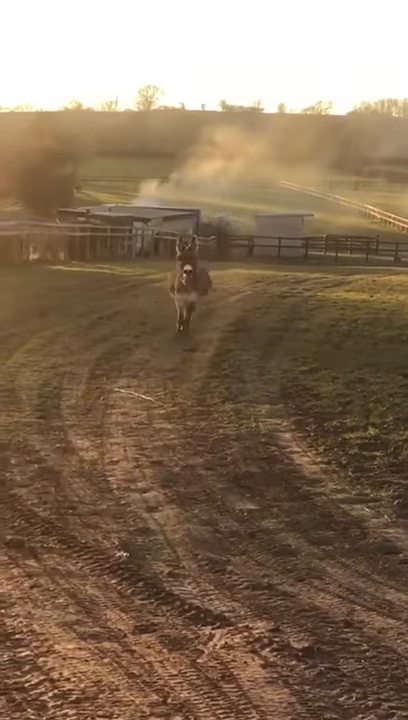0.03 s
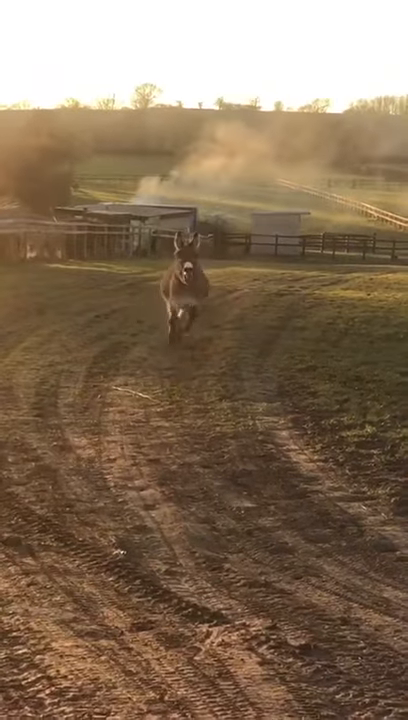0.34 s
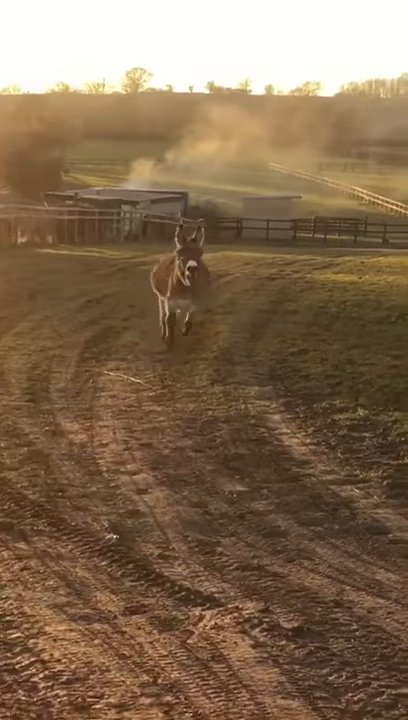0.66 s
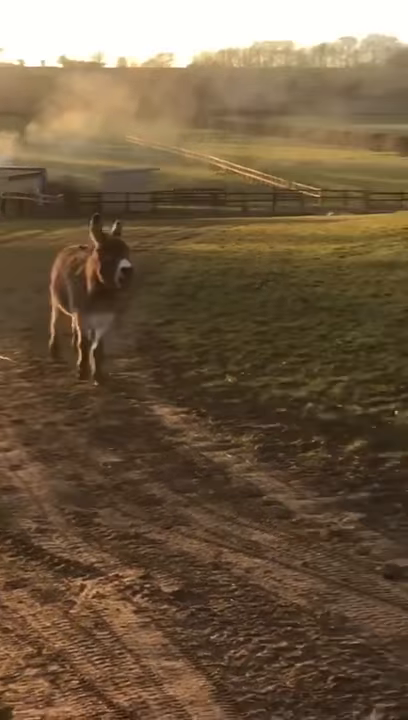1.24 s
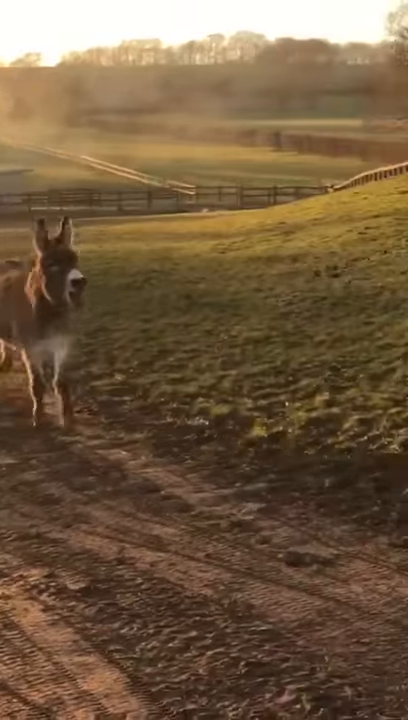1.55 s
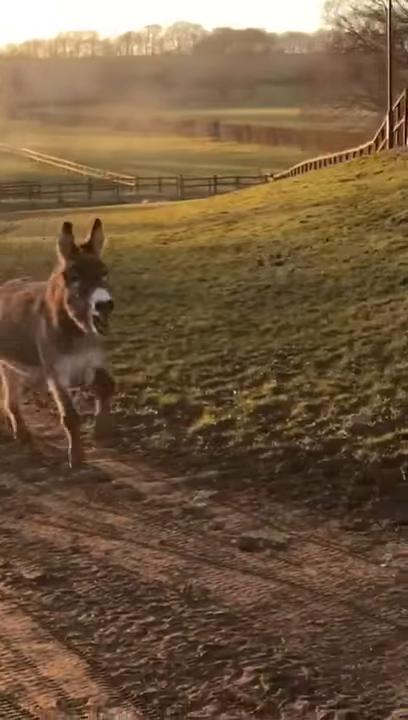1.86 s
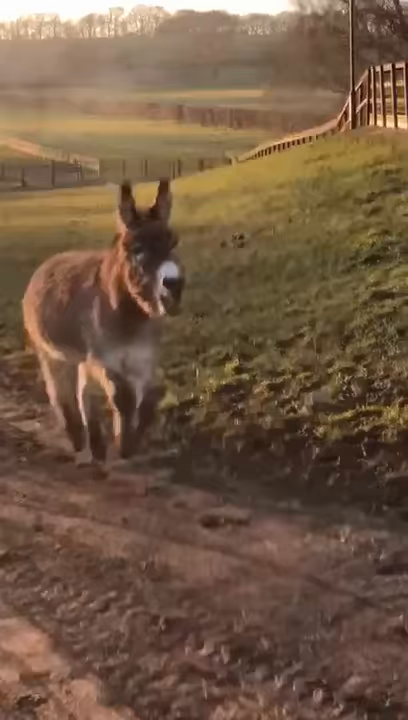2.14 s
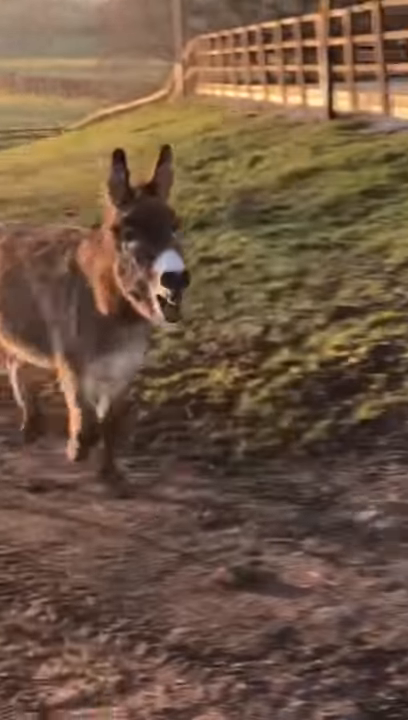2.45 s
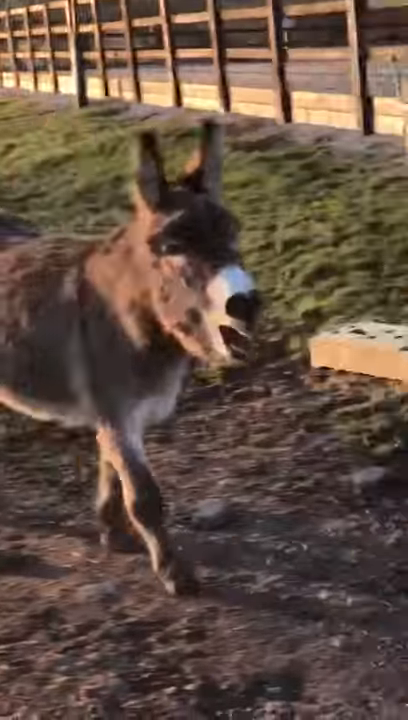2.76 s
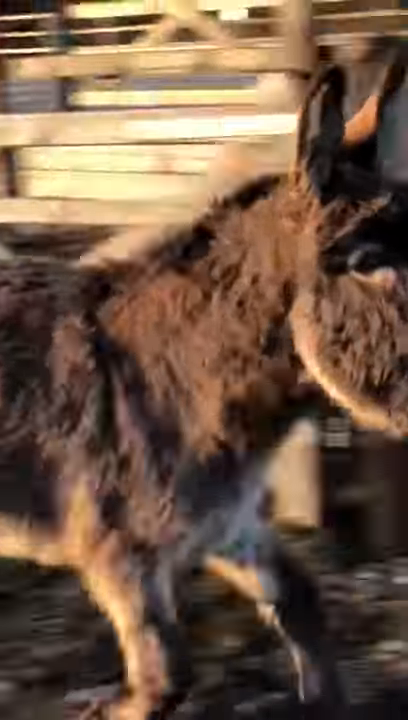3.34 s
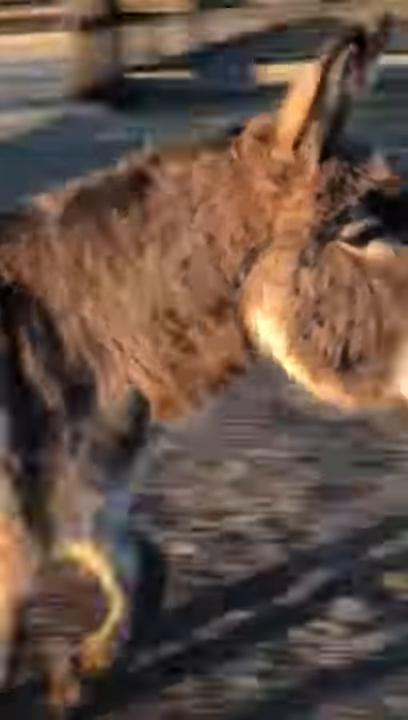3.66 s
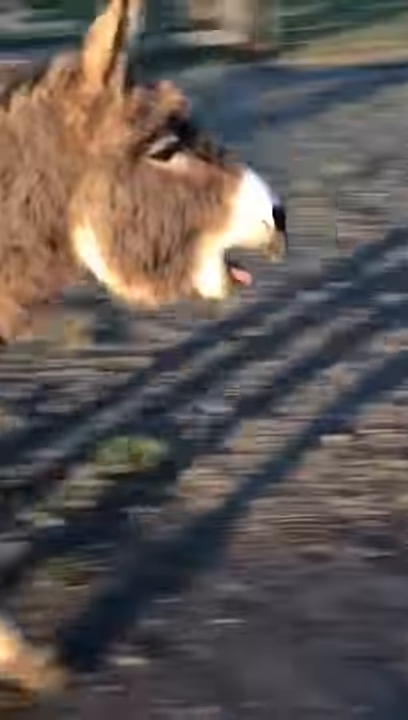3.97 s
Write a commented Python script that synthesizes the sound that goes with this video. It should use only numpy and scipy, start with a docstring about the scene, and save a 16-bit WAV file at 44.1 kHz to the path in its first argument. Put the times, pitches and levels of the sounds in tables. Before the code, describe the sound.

Loud braying from an approaching donkey: hoarse, lower haws alternate with squealing gasps that end in thin whistles. The later calls sound nearer the microphone, with a faint outdoor echo over soft hiss and low rumble.

```python
"""A donkey brays five times as it comes across a field and passes close by.
Its vocal folds chop the breath into pulses: each "haw" starts as a clear note, then breaks into a
rough, lower roar. Between haws it sucks in air with a wheezing "hee" that ends in a thin whistle,
and it grunts as the breath turns around. The field echoes faintly over a hiss, a rumble and a hum."""
import sys
import numpy as np
from scipy import signal
from scipy.fft import rfft, irfft, next_fast_len
from scipy.io import wavfile
from scipy.ndimage import uniform_filter1d, minimum_filter1d

SR = 44100
rng = np.random.default_rng(int(sys.argv[2]) if len(sys.argv) > 2 else 0)


def file_out(sig):
    """Save sig as 16-bit WAV at sys.argv[1]."""
    # one column per channel
    cols = np.atleast_2d(sig).T
    # limit, then scale
    lim = np.clip(cols, -1, 1)
    pcm = np.round(lim * 32767).astype(np.int16)
    wavfile.write(sys.argv[1], SR, pcm)


N = 176400

# Tone colours of the open air, the rumble and the echo: (frequency [Hz], relative level [dB])
AIR_COLOUR = [(130, -11), (250, 19.5), (1100, 23), (2200, 20), (4200, 15), (11500, -6)]
RUMBLE_COLOUR = [(20, -22), (55, 6), (110, 4), (190, -2.5), (700, -35), (2000, -53)]
ECHO_COLOUR = [(200, -17), (1100, -3.5), (2000, -5), (3000, -17), (4200, -10), (12000, -30.5)]
# How loud the rumble and the hum are: (time [s], level [dB])
RUMBLE_LEVEL = [(0, -50), (1.15, -54), (1.62, -38), (1.77, -48.5), (1.85, -34.5), (1.95, -45), (2.5, -55.5),
                (3.15, -51), (4, -65.5)]
HUM_LEVEL = [(0, -47.5), (2, -60)]
# How long the echo lasts: (frequency [Hz], time to fade by 60 dB [s])
ECHO_DECAY = [(200, 0.88), (1000, 0.24), (4200, 0.43), (7000, 0.38)]

# Tone colours of the voice and breath: (frequency [Hz], relative level [dB])
NOTE_THROAT = [(250, -24.5), (500, -6.5), (950, 3.5), (1550, 4), (2050, -7.5), (2550, -29.5), (3400, -20),
               (4200, -19), (5200, -34), (6300, -28.5), (8000, -42.5), (11500, -46)]
ROAR_THROAT = [(230, -33.5), (450, -7.5), (670, -9.5), (790, -9.5), (980, 9), (1350, -2), (2000, -5.5),
               (2450, -22.5), (4600, -15), (7200, -30), (8500, -44.5), (11500, -37)]
FAR_THROAT = [(230, -27.5), (400, -9.5), (630, -7), (760, -30), (980, 6.5), (1230, 2.5), (1750, 1),
              (2400, -22.5), (4100, -21.5), (6300, -22), (11500, -66)]  # the roar from far away
LEAK_COLOUR = [(300, -43.5), (1200, -3.5), (3000, -19), (4400, -10.5), (7300, -25), (11500, -34.5)]  # air leaking past the folds
RUSH_COLOUR = [(150, -22), (600, -21), (1050, -5.5), (1600, -12.5), (2300, -2.5), (2700, -5.5), (3600, -2),
               (4700, -9), (6200, -12.5), (7400, -16.5), (9600, -22.5), (11500, -36)]  # rushing breath
# Where the voice flickers most: (frequency [Hz], share of the full flicker [0-1])
FLICKER_SHARE = [(1800, .1), (3000, .7), (4200, .4), (6000, 1)]
# The throat's resonances, the pitches it rings at: (frequency [Hz])
THROAT_RINGS = [850, 1250, 1800]
# The mouth's resonances in a roar:
# (time [s], low boost [dB], middle frequency [Hz], middle boost [dB], upper frequency [Hz])
MOUTH_SHAPE = [(.33, -6.5, 1696, 4.5, 4210), (1.301, 2, 1410, 5, 4110), (2.07, 2.5, 1985, 6, 4560),
               (2.24, 2, 1784, 8.5, 4166), (2.32, -4, 1670, 4.5, 4120), (2.489, -1, 1546, 3.5, 3810),
               (3.072, 3.5, 1806, 9.5, 3910), (3.189, -7.5, 1676, 2, 4280), (3.249, -14, 1938, 6, 4620),
               (3.32, -7.5, 1936, 2.5, 4520), (3.92, 2, 1835, 8, 4700)]
# The upper resonance fades as the head turns aside: (time [s], strength [dB])
HEAD_TURN = [(2.5, -4), (3.2, -8.5), (4, -22)]

# Grunts: (start [s], length [s], first pitch [Hz], last pitch [Hz], level [dB], roughness [0-1],
# treble [dB])
GRUNTS = [(0.038, .11, 128.7, 243, -36.5, 0.24, 15), (0.549, 0.049, 368.7, 403, -27.5, 0.34, -6),
          (0.657, 0.073, 299.4, 210.5, -33.5, 0.23, 9.5), (0.964, 0.038, 222.4, 189, -38, 0.35, 9),
          (1.933, 0.034, 227.4, 174, -35.5, 0.54, 4), (2.573, 0.06, 103.8, 93.3, -43.5, 0.46, 15)]
# One spit of air: (start [s], length [s], level [dB])
CRACKLE = (3.157, 0.017, -23.5)
# Whistles: (start [s], length [s], first pitch [Hz], last pitch [Hz], level [dB])
WHISTLES = [(0.888, 0.075, 5380, 5420, -31.5), (1.683, 0.043, 5130, 5210, -23),
            (1.728, 0.22, 5220, 5247, -30), (1.857, 0.059, 5090, 5440, -25.5),
            (2.816, 0.059, 5170, 5360, -24), (3.66, 0.12, 4830, 5220, -33.5)]
# In-breaths, one curve each: (time [s], upper resonance [Hz], lower resonance [Hz],
# upper level [dB], lower level [dB], rush level [dB])
HEES = [
    [(.729, 4210, 2274, -25, -63, -43), (.76, 4340, 2180, -21, -36, -31.5),
     (.785, 4210, 1950, -13, -29.5, -28), (.825, 4180, 1780, -11.5, -15.5, -26),
     (.865, 4167, 1777, -9.5, -13.5, -24.5), (.9, 3970, 1784, -13.5, -22, -28),
     (.945, 4050, 2290, -34, -33.5, -37)],
    [(1.518, 4400, 2260, -40, -79, -34.5), (1.555, 4630, 2280, -16, -22, -28.5),
     (1.59, 4210, 2090, -11, -25.5, -20.5), (1.635, 4050, 1620, -18, -21, -22.5),
     (1.68, 3610, 1652, -24.5, -25.5, -25), (1.77, 3490, 2128, -25.5, -35.5, -35.5),
     (1.84, 3510, 2096, -24.5, -26, -29), (1.9, 3490, 2147, -27.5, -26.5, -30),
     (1.93, 3700, 2290, -47, -44, -60)],
    [(2.628, 4004, 2074, -41, -61, -34), (2.648, 4300, 2158, -13.5, -43, -30),
     (2.675, 4066, 2100, -16, -13, -19), (2.72, 4080, 1773, -10.5, -11.5, -20.5),
     (2.775, 4007, 1560, -15.5, -13.5, -17), (2.81, 3820, 1670, -19, -12.5, -21.5),
     (2.845, 3850, 1970, -50, -35, -21), (2.87, 3930, 2300, -53, -39, -66)],
    [(3.476, 3990, 2130, -34, -62, -36), (3.497, 4010, 2000, -17, -30.5, -29.5),
     (3.54, 4130, 1900, -14.5, -15, -22), (3.575, 4130, 1700, -19, -10.5, -20.5),
     (3.625, 3860, 1555, -23, -15.5, -27), (3.68, 4140, 1232, -35, -16, -32),
     (3.72, 4100, 1342, -51, -19.5, -26.5), (3.76, 4090, 1397, -65, -54, -40.5)],
]
# Clear notes, one curve each: (time [s], pitch [Hz], level [dB], treble [dB])
NOTES = [
    [(.185, 513, -34, -21), (.205, 506.6, -23, 4), (.272, 530.6, -14.5, 0), (.30, 528, -53, 15),
     (.41, 539.7, -23, -9), (.44, 525, -19, 7), (.54, 499, -17, 2), (.585, 471, -32, -9)],
    [(1.083, 502, -30, -1), (1.102, 502.6, -15.5, 2), (1.2, 531, -16, 6), (1.26, 533, -15, 7),
     (1.285, 501, -46, 12)],
    [(1.35, 494, -9.5, -12), (1.368, 491, -15, -19), (1.39, 443, -15, -12), (1.408, 400, -29, -4)],
    [(2.006, 470, -27, 0), (2.022, 436.4, -12, 7), (2.042, 450, -9, 2), (2.06, 490, -24, 6),
     (2.085, 503, -28, 0)],
    [(2.993, 494, -27, -25), (3.005, 458.7, -15.5, 2), (3.02, 482, -8, 0.5), (3.048, 498.7, -11.5, 1),
     (3.07, 537.5, -11.5, 9), (3.09, 507, -44, 16)],
    [(3.85, 472, -19, -17), (3.866, 428, -20, 0.5), (3.884, 430, -9.5, 3.5), (3.895, 507, -17, 5),
     (3.915, 503, -38, 8)],
]
# Roars, one curve each: (time [s], pitch [Hz], level [dB], base tone level [dB], roughness [0-1],
# treble [dB])
ROARS = [
    [(.262, 346.6, -21, -70, 0.8, -7), (.295, 337, -15, -20.5, 0.47, 0.5),
     (.33, 305.3, -14.5, -52, 0.12, -12), (.365, 336, -17, -30, 0.6, 0), (.39, 339, -16.5, -19, 0.15, -8),
     (.425, 358, -17.5, -38, 0.86, -1.5), (.455, 322, -19, -60, 0.6, -19)],
    [(1.25, 363.6, -16, -65, 0.87, -6), (1.285, 369.8, -13, -52, 0.65, 1.5),
     (1.32, 344.7, -12, -21.5, 0.37, -1), (1.35, 378.2, -13, -38, 0.49, 0.5),
     (1.385, 332, -23, -46, 0.54, 8), (1.42, 327, -29, -46, 0.6, -8)],
    [(2.04, 312.1, -16.5, -80, 0.75, -0.5), (2.08, 324, -8.5, -16, 0.77, -2.5),
     (2.115, 319.6, -6.5, -76, 0.39, -2.5), (2.16, 329.9, -10.5, -28, 0.19, -4),
     (2.26, 342, -9.5, -50, 0.25, -3), (2.31, 335.8, -5.5, -26.5, 0.28, -6.5),
     (2.45, 330.3, -7.5, -27.5, 0.14, -7.5), (2.48, 314.8, -5, -27, 0.39, -3),
     (2.5, 314, -7, -34, 0.32, -8.5), (2.518, 326, -17, -34, 0.54, -3)],
    [(3.058, 330.2, -20, -62, 0.2, -1), (3.078, 333, -9.5, -14, 0.97, -3),
     (3.11, 330.8, -14.5, -17.5, 0.1, 0.5), (3.16, 339.5, -11.5, -8, 0.35, -7),
     (3.195, 331.8, -7.5, -17.5, 0, -10), (3.24, 333, -8.5, -13.5, 0.37, -4.5),
     (3.31, 326.4, -8, -15, 0.64, -10), (3.345, 344.8, -12.5, -18, 0.66, -4.5),
     (3.385, 389, -42, -31, 0.9, -9)],
    [(3.897, 342.7, -10, -59, 0.3, -4), (3.918, 333.8, -9, -17.5, 0.65, -5.5),
     (3.95, 328.3, -9.5, -15, 0.16, -6), (4.01, 327.3, -18.5, -11, 0.2, 9)],
]
# Moments when a roar catches in the throat: (time [s])
CATCH_TIMES = [2.052, 2.09, 2.146, 2.177, 2.284, 2.31, 2.345, 2.366, 2.389, 2.419, 2.449, 3.13, 3.157]
# The octave above the base tone grows as the head passes: (time [s], relative level [dB])
OCTAVE_LEVEL = [(3.3, -39.5), (4, -10)]

NEAR_FROM_S, CHEST_FROM_S = 1.7, 2.7  # later roars sound near; later notes sound fuller
SLIPS_PER_S, SLIP_S = 28, .0032  # typical rate and duration of the folds' little slips


def amp(db):
    """Turns decibels into a number to multiply by."""
    return 10 ** (np.asarray(db) / 20)


def unit(x):
    """Scales a signal to an average strength (rms) of 1."""
    return x / np.sqrt(np.mean(x ** 2) + 1e-20)


def at_hz(table, hz):
    """Looks up a frequency in a table, giving each octave equal room."""
    f, value = np.transpose(table)
    return np.interp(np.log(hz + 1), np.log(f), value)


def at_time(table, t):
    """Reads each column of a table at the times t."""
    times, *columns = np.transpose(table)
    return [np.interp(t, times, column) for column in columns]


def gain_at(table, t):
    """Reads a curve of decibels as numbers to multiply by."""
    return amp(at_time(table, t)[0])


def controls(rows):
    """Gives the time of every sample in a curve, then each column at those times."""
    t = np.arange(round(rows[0][0] * SR), round(rows[-1][0] * SR)) / SR
    return [t] + at_time(rows, t)


def add(mix, start, sound, fade_s=.008):
    """Mixes a sound in, with soft ends."""
    i = np.arange(len(sound))
    fade = np.minimum(np.minimum(i, i[::-1]) / (fade_s * SR), 1)
    part = mix[max(round(start * SR), 0):][:len(sound)]
    part += (sound * fade)[:len(part)]


def noise(size):
    """Plain white hiss."""
    return rng.standard_normal(max(size, SR))[:size]


def wander(size, hz):
    """A random wobble, up to about hz times a second."""
    f = np.fft.rfftfreq(SR, 1 / SR)
    return unit(irfft(rfft(noise(SR)) / (1 + (f / hz) ** 4)))[:size]


def colour(x, table):
    """Gives a sound a tone colour and a strength of 1."""
    size = next_fast_len(len(x) + 2048)
    log_gain = np.log(amp(at_hz(table, abs(np.fft.fftfreq(size, 1 / SR)))))
    response = np.exp(np.conj(signal.hilbert(log_gain)))  # rings after a pulse, not before
    return unit(np.fft.ifft(np.fft.fft(x, size) * response).real[:len(x)])


def brighten(x, db):
    """Turns the treble up or down."""
    treble = signal.sosfiltfilt(signal.butter(3, 2600, 'high', fs=SR, output='sos'), x)
    return x + (amp(db) - 1) * treble


def background(air_db=-46.5, hum_hz=78):
    """The hiss of open air, an uneven low rumble and a distant hum."""
    t = np.arange(N) / SR
    rumble = gain_at(RUMBLE_LEVEL, t) * colour(noise(N), RUMBLE_COLOUR)
    hum = gain_at(HUM_LEVEL, t) * unit(np.sin(2 * np.pi * hum_hz * t))
    return amp(air_db) * colour(noise(N), AIR_COLOUR) + rumble + hum


def field_echo(x, db=-27, echoes_per_s=2000, build_s=.054):
    """Many tiny echoes bounce back from the bank, fences and sheds."""
    bounces = noise(SR) * (rng.random(SR) < echoes_per_s / SR)
    hz, t, bands = signal.stft(bounces, SR, nperseg=256)
    decay = amp(-60 * t / at_hz(ECHO_DECAY, hz)[:, None])
    tail = signal.istft(bands * decay, SR, nperseg=256)[1]
    tail = colour(tail * np.minimum(np.arange(len(tail)) / (build_s * SR), 1), ECHO_COLOUR)
    return signal.fftconvolve(x, tail / np.linalg.norm(tail))[:N] * amp(db)


def flicker(x, depth_db=4.2):
    """The treble of the voice comes and goes in random patches."""
    hz, _, bands = signal.stft(x, SR, nperseg=512, noverlap=384)
    patches = rng.standard_normal(bands.shape[::-1]).T
    for _ in range(2):
        patches = uniform_filter1d(uniform_filter1d(patches, size=5, axis=0), size=22, axis=1)
    share = np.interp(hz, *np.transpose(FLICKER_SHARE))[:, None]
    bands = bands * amp(depth_db * share * unit(patches))
    return signal.istft(bands, SR, nperseg=512, noverlap=384)[1][:len(x)]


def fold_pulses(cycles):
    """The vocal folds make one sharp pulse per cycle, shared here between two samples."""
    pulses = np.zeros(len(cycles))
    at = np.flatnonzero(np.diff(np.floor(cycles)) > 0)
    late = (np.floor(cycles[at + 1]) - cycles[at]) / (cycles[at + 1] - cycles[at])
    pulses[at], pulses[at + 1] = 1 - late, late
    return pulses - pulses.mean()


def swirl(hz, width_hz):
    """Swirling air in a resonance makes an unsteady tone; .real gives the sound."""
    drift = wander(len(hz), width_hz / 2) + 1j * wander(len(hz), width_hz / 2)
    return drift * np.exp(2j * np.pi * np.cumsum(hz) / SR)


def rasp(cycles, air_share, throat=ROAR_THROAT):
    """A pulse and a puff of air pass through the wide-open throat on every cycle."""
    puffs = (.75 + np.exp(-(cycles % 1) / .85)) * noise(len(cycles))
    pulses = colour(fold_pulses(cycles), throat)
    return np.sqrt(1 - air_share) * pulses + np.sqrt(air_share) * colour(puffs, throat)


def throat_ring(x, width_hz=260):
    """The throat stores each pulse and lets it out late, without changing its colour."""
    decay = np.exp(-np.pi * width_hz / SR)
    for hz in THROAT_RINGS:
        poles = [1, -2 * decay * np.cos(2 * np.pi * hz / SR), decay * decay]
        x = signal.lfilter(poles[::-1], poles, x)
    return x


def resonate(x, hz, width_hz):
    """Picks out the part of a sound near one frequency, which may glide."""
    spin = np.exp(2j * np.pi * np.cumsum(hz * np.ones(len(x))) / SR)
    decay = np.exp(-np.pi * width_hz / SR)
    return 2 * (spin * signal.filtfilt([1 - decay], [1, -decay], x / spin, padtype='even')).real


def mouth(x, t, low_hz=1060, width_hz=250, upper_width_hz=520):
    """Three resonances shape the roar; the upper two glide with the jaw and hiss with swirling air."""
    low_db, middle_hz, middle_db, upper_hz = at_time(MOUTH_SHAPE, t)
    facing = gain_at(HEAD_TURN, t)
    x = x + amp(middle_db - 25) * unit(swirl(middle_hz, width_hz).real)
    x = x + facing * amp(-24) * unit(swirl(upper_hz, upper_width_hz).real)
    x = x + (amp(low_db) - 1) * resonate(x, low_hz, width_hz)
    x = x + (amp(middle_db) - 1) * resonate(x, middle_hz, width_hz)
    return x + (amp(8 * facing) - 1) * resonate(x, upper_hz, upper_width_hz)


def grunt(start, length, first_hz, last_hz, db, rough, treble_db):
    """Slack folds give a short, gliding creak that swells and fades."""
    progress = np.linspace(0, 1, round(length * SR))
    cycles = np.cumsum(first_hz + (last_hz - first_hz) * progress) / SR
    swell = np.sin(np.pi * progress ** .88)
    return start, amp(db) * unit(brighten(rasp(cycles, rough), treble_db) * swell)


def crackle(start, length, db):
    """A brief spit of air as the folds burst open."""
    size = round(length * SR)
    return start, amp(db) * unit(colour(noise(size), RUSH_COLOUR) * np.hanning(size))


def whistle(start, length, first_hz, last_hz, db, waver_hz=38, flutter_db=4, octave_db=-21):
    """The in-breath ends in a thin, unsteady whistle with a faint octave above it."""
    progress = np.linspace(0, 1, round(length * SR))
    hz = first_hz + (last_hz - first_hz) * progress + waver_hz * wander(len(progress), 233)
    phase = 2 * np.pi * np.cumsum(hz) / SR
    swell = np.sin(np.pi * progress) * amp(flutter_db * wander(len(progress), 85))
    return start, amp(db) * unit(swell * (np.sin(phase) + amp(octave_db) * np.sin(2 * phase)))


def hee(rows, waver_hz=65, full_squeal_db=-15, fray_db=-9.5, flutter_db=1.5):
    """Air rushing in sets off two resonances: they squeal when driven hard and fray when weak."""
    t, upper_hz, lower_hz, upper_db, lower_db, rush_db = controls(rows)
    tones = 0
    for hz, width_hz, db in (upper_hz, 137, upper_db), (lower_hz, 224, lower_db):
        firmness = amp(.65 * np.minimum(db - full_squeal_db, 0))
        squeal = swirl(hz + waver_hz * wander(len(t), 241), width_hz)
        squeal = unit((squeal / np.hypot(abs(squeal), .5)).real)  # its strength hits a ceiling
        fray = amp(fray_db) * unit(swirl(hz, .21 * hz.mean()).real)  # a wider band of hiss
        tones += amp(db) * (firmness * squeal + fray) / np.hypot(firmness, amp(fray_db))
    rush = amp(rush_db) * colour(noise(len(t)), RUSH_COLOUR)
    flutter = unit(amp(-flutter_db * wander(len(t), 90)))
    return t[0], (tones + rush) * flutter


def clear_note(rows, pitch_wobble=.0079, leak_db=-27, chest_db=-12.5):
    """The folds pulse steadily with a trace of air; close by, the lowest tone fills out."""
    t, hz, db, treble_db = controls(rows)
    cycles = np.cumsum(hz * (1 + pitch_wobble * wander(len(t), 95))) / SR
    voice = throat_ring(colour(fold_pulses(cycles), NOTE_THROAT))
    voice += amp(leak_db) * colour(noise(len(t)), LEAK_COLOUR)
    bass = unit(signal.sosfiltfilt(signal.butter(4, 620, fs=SR, output='sos'), voice))
    chest = amp(chest_db) * (t[0] > CHEST_FROM_S) * bass
    return t[0], amp(db) * (brighten(voice, treble_db) + chest)


def catches(t, choke_s=.0038, surge_s=.011):
    """At each catch the voice chokes, then surges back; both curves run from 0 to 1."""
    since = t[:, None] - np.array(CATCH_TIMES)
    choke = np.exp(-(since / choke_s) ** 2).max(1)
    surge = ((since > 0) * np.exp(-abs(since) / surge_s)).max(1)
    return choke, surge


def roar(rows, leak_db=-18, choke_depth=.7, surge_db=5.5):
    """The folds flap slower and unevenly, and now and then slip and catch again."""
    t, hz, db, base_db, rough, treble_db = controls(rows)
    size = len(t)
    choke, surge = catches(t)
    slip_count = np.cumsum(SLIPS_PER_S * np.exp(.5 * wander(size, 31.8))) / SR
    slip = np.exp(-((slip_count % 1 - .5) / (SLIP_S * SLIPS_PER_S)) ** 2)
    jitter = .11 * wander(size, 55) + .04 * wander(size, 123)  # pulses come early or late
    cycles = np.cumsum(hz * (1 + .025 * surge)) / SR  # a surge lifts the pitch a little
    cycles = cycles + rough * jitter + .018 * slip * wander(size, 120)
    strong_weak = .35 * np.cos(np.pi * cycles)  # every other pulse is stronger
    force = 1 + rough * (.38 * wander(size, 170) + strong_weak)
    throat = ROAR_THROAT if t[0] > NEAR_FROM_S else FAR_THROAT
    voice = rasp(cycles, .35 * rough ** 2, throat) * force * (1 - .35 * slip)
    leak = amp(leak_db) * colour(noise(size), LEAK_COLOUR)
    voice = unit(mouth(throat_ring(voice) + leak, t))
    voice *= (1 - choke_depth * choke) * amp(surge_db * surge)
    octave = gain_at(OCTAVE_LEVEL, t) * np.cos(4 * np.pi * cycles)
    base_tone = np.sqrt(2) * (np.cos(2 * np.pi * cycles) + octave)
    base_tone *= 1 + .29 * rough * wander(size, 33)
    return t[0], amp(db) * brighten(voice, treble_db) + amp(base_db) * base_tone


def scene():
    """The braying donkey, its echo and the open field, in one channel."""
    donkey = np.zeros(N)
    for source, curves in (clear_note, NOTES), (roar, ROARS), (hee, HEES):
        for rows in curves:
            add(donkey, *source(rows))
    for source, table in (whistle, WHISTLES), (grunt, GRUNTS):
        for row in table:
            add(donkey, *source(*row))
    add(donkey, *crackle(*CRACKLE))
    donkey = flicker(donkey)
    return (donkey + field_echo(donkey) + background())[None]


def record(dry, ceiling=.93, cutoff_hz=11900):
    """Turns the loudest peaks down quickly, then cuts off the highest treble."""
    gain = np.minimum(1, ceiling / (abs(dry) + 1e-9))
    held = dry * uniform_filter1d(minimum_filter1d(gain, size=130), size=130)
    treble_cut = signal.firwin(255, cutoff_hz, window=("kaiser", 8), fs=SR)
    return signal.oaconvolve(held, treble_cut[None], "same")


dry = scene()
out = record(dry)
file_out(out)
```